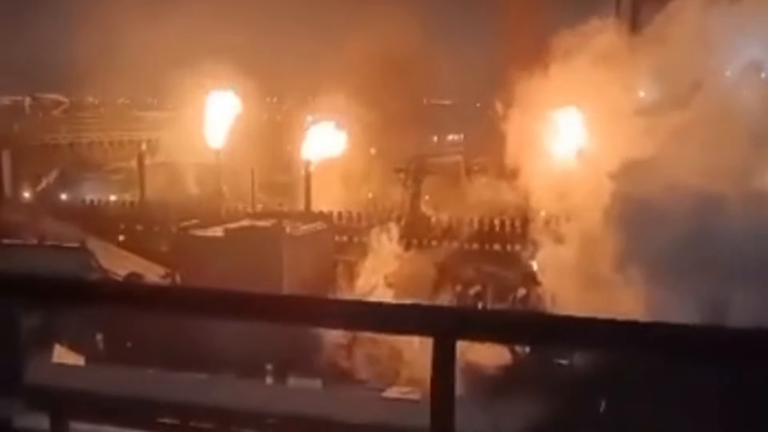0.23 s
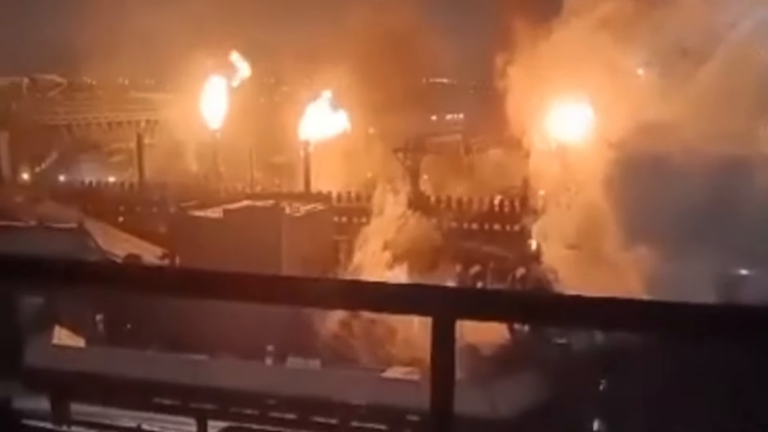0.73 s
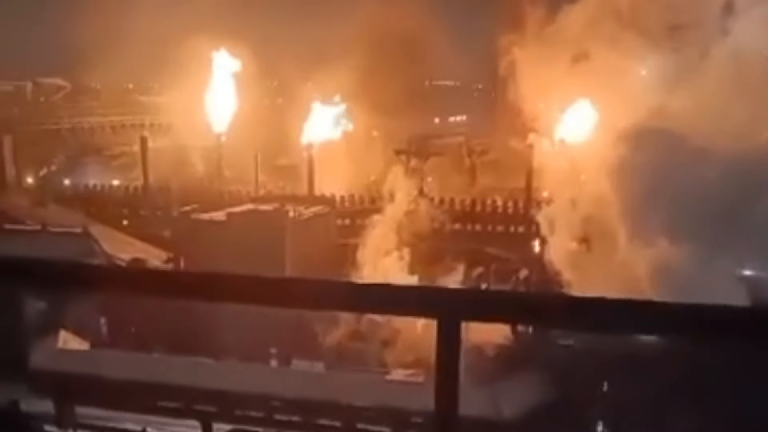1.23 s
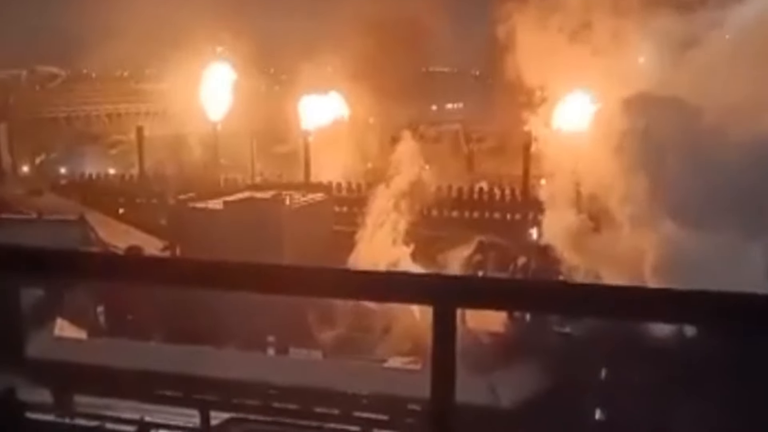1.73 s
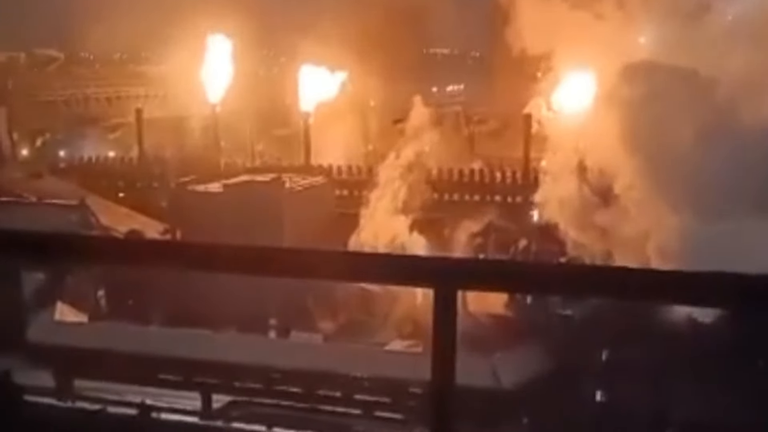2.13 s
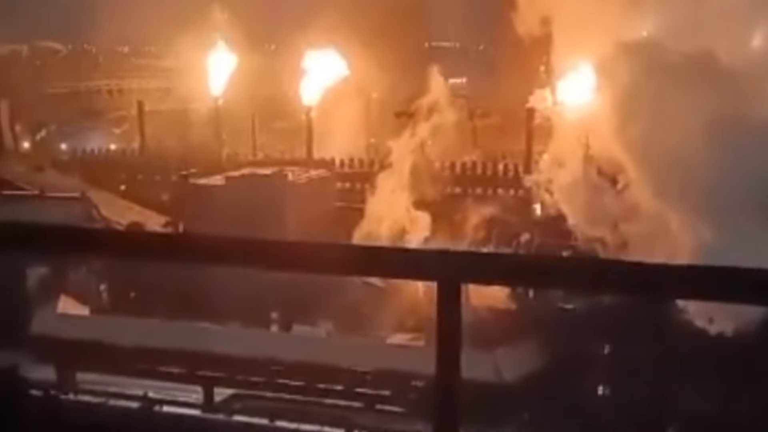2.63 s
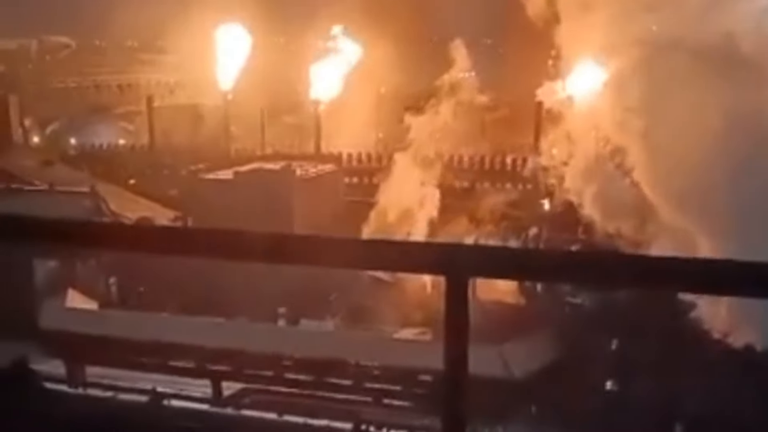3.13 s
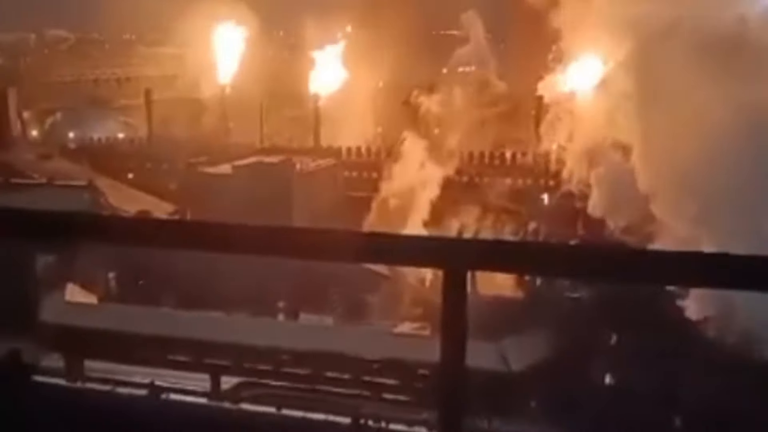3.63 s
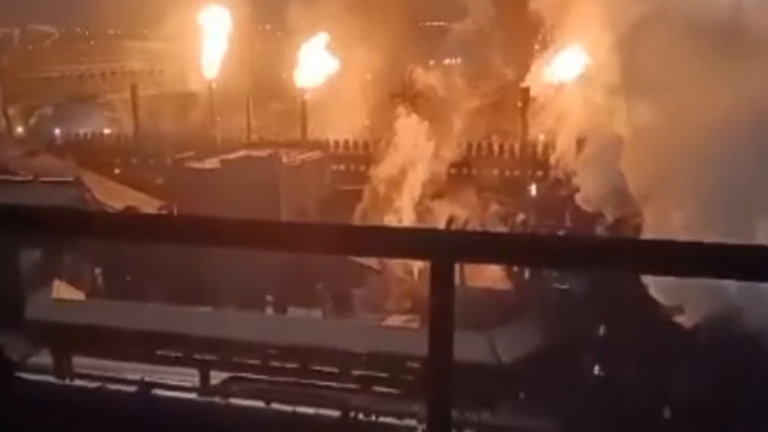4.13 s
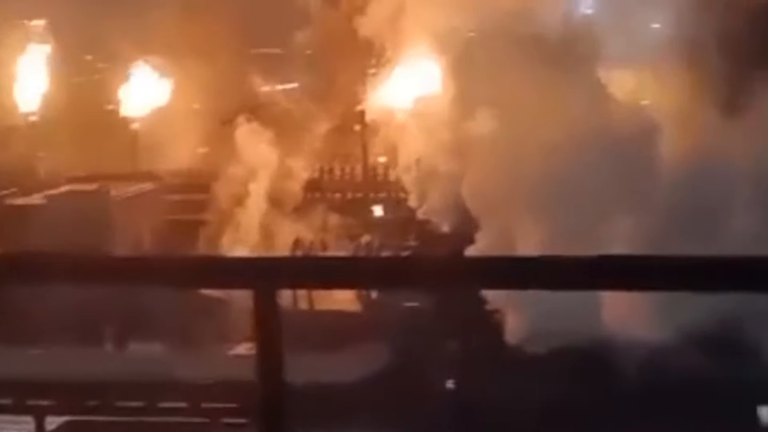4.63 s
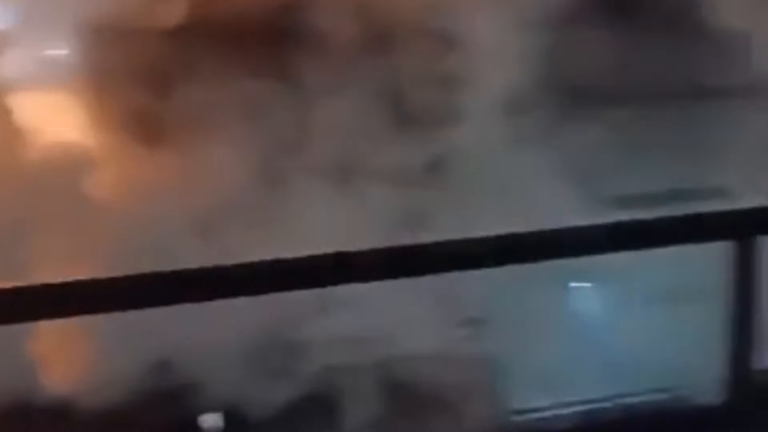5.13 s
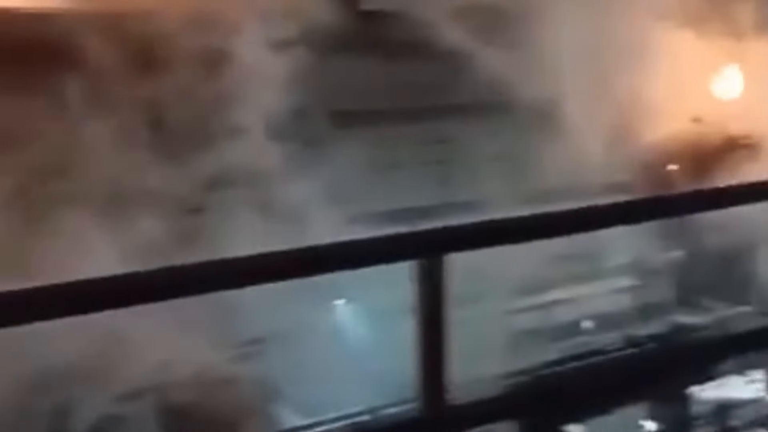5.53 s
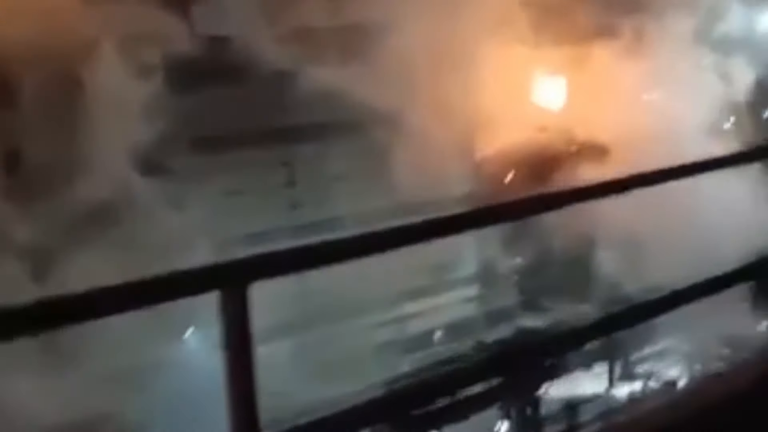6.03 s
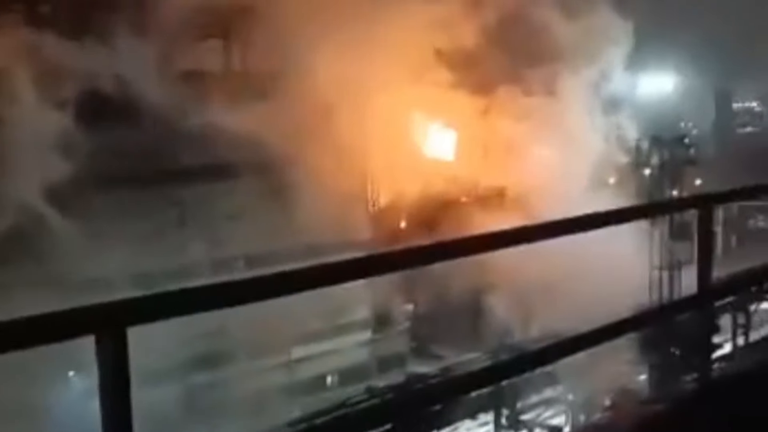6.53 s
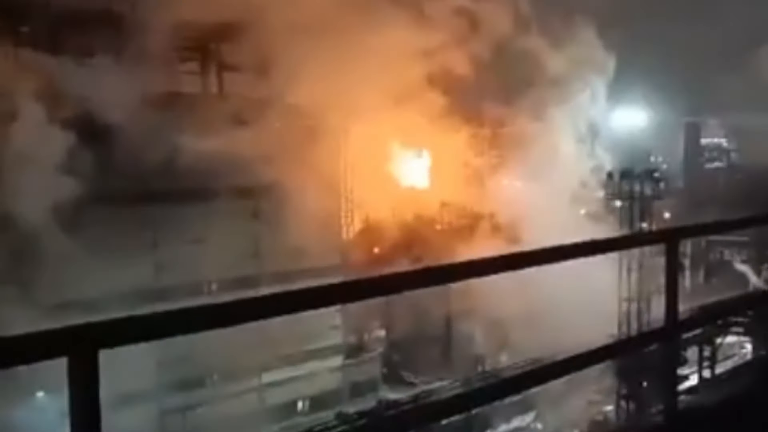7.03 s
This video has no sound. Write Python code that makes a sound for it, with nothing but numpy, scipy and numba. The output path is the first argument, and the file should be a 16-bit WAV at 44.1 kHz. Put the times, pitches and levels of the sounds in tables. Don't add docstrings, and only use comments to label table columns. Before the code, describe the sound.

A row of gas flares at an industrial works, a few hundred metres away in open night air, gives a continuous deep roar with a broad gassy rush and thin high whistling hiss. A faint low blower hum wavers in and out beneath. From 0 to 0.7 s wind buffets the phone's microphones, thumping and knocking separately left and right. It eases from about 0.9 to 1.7 s, leaving roar and hiss, then hits again around 1.8-2.4 s. After a calmer second, gusts return at 3.4-4.2 s. Small whumps of gas catching come near 4.4-4.9 s as the phone swings right; wind grows raspier, with dense hard knocks from 4.9 to 5.9 s. The level ducks under strong hits. From 6 s the wind falls away and the fire swells to the end, fluttering with rapid soft whumps. The hiss sounds grainy and watery, with dulled top end.

```python
import sys
import numpy as np
from scipy import signal
from scipy.fft import rfft, irfft, next_fast_len
from scipy.io import wavfile
from scipy.ndimage import uniform_filter1d
from numba import njit

SR = 44100
rng = np.random.default_rng(int(sys.argv[2]) if len(sys.argv) > 2 else 0)


def inscribe(sig):
    pcm = np.round(np.clip(np.atleast_2d(sig).T, -1, 1) * 32767)
    wavfile.write(sys.argv[1], SR, pcm.astype(np.int16))


def volts_from_decibels(level):
    exponent = np.asarray(level, float) / 20
    return 10 ** exponent


N = 320594
T = np.arange(N) / SR
M = next_fast_len(N)
LOG_HZ = np.log(np.fft.rfftfreq(M, 1 / SR) + 1e-3)

# time in seconds, share 0-1.
FACING = [
    (0, 0.79),
    (1, 0.77),
    (2, 0.75),
    (3.5, 0.9),
    (4.5, 0.82),
    (5, 0.5),
    (6, 0.46),
    (7.27, 0.37),
]

# frequency in Hz, level in dB.
RUMBLE_COLOUR = [(15, -48), (30, -16), (45, -19), (60, -6), (95, -5), (150, -2.5), (220, -2.5), (300, -17),
                 (400, -63)]
BODY_COLOUR = [(150, -57), (220, -3.5), (290, 1.5), (430, -1), (560, -5.5), (700, -9), (900, -38.5)]
EDGE_COLOUR = [(400, -45), (560, -6), (700, 0), (1000, -5), (1350, -10.5), (1700, -35), (2200, -41)]
# time in seconds, level in dB.
ROAR = [(0, -30.5), (.8, -29), (1.5, -29), (2.0, -28), (2.5, -29), (3.3, -28), (3.9, -27.5), (4.4, -25),
        (4.9, -26), (5.5, -27.5), (6.1, -27), (6.7, -24.5), (7.27, -23.5)]
# time in seconds, level in dB.
BURN = [(0, -36), (.8, -36), (1.4, -36.5), (2.0, -35.5), (2.8, -35.5), (3.5, -36.5), (4.2, -35),
        (4.8, -34.5), (5.3, -33.5), (5.9, -35), (6.4, -32.5), (6.8, -29.5), (7.27, -28)]
# time in seconds, gain in dB.
LULLS = [(0, 0.5), (.5, -2), (1.05, -4.5), (1.4, -1), (2.0, 0), (2.6, -2.5), (3.2, 1), (4.0, 0), (4.7, 1),
         (5.3, -1), (6.2, -1.5), (7.27, 0.5)]
# time in seconds, peak in dB, pitch in Hz.
WHUMPS = [(4.415, -20, 263), (4.477, -14, 297), (4.699, -24, 250), (4.89, -29, 200), (6.036, -12.5, 346),
          (6.265, -15, 250), (6.379, -16, 304), (6.553, -16.5, 190), (6.64, -14, 308), (6.678, -15.5, 198),
          (6.848, -16, 480), (7.0, -14, 402), (7.035, -12.5, 297), (7.125, -18, 198)]

# frequency in Hz, level in dB.
RUSH_COLOUR = [(900, -6), (1300, -1.5), (1600, 2), (2200, 2), (3000, 2.5), (3600, 1), (4100, -2.5),
               (4600, -8.5), (5400, -32)]
WHISTLE_COLOUR = [(3800, -16.5), (4500, -5), (5300, -2), (6300, 1.5), (7300, 2.5), (7900, -2.5), (8420, -6),
                  (8650, -22), (9300, -9), (9700, -15.5), (10800, -10.5), (11500, -8), (11900, -7)]
# time in seconds, level in dB.
FLOW = [(0, -31), (.5, -32.5), (.75, -33.5), (1.4, -34), (1.62, -31.5), (2.3, -31), (2.65, -30.5),
        (3.0, -32.5), (3.3, -29), (3.8, -31), (4.0, -32.5), (4.5, -31), (5.1, -33), (5.7, -35.5),
        (6.0, -33), (6.4, -32.5), (6.6, -35), (7.27, -31.5)]
# frequency in Hz, left minus right in dB.
PORT_CAVITIES = [(2000, 1), (4500, -2), (5800, 4), (6600, 1.5), (7400, -5.5), (8300, -4), (10000, -1),
                 (12000, -10)]
# frequency in Hz, level against the common part in dB.
OPPOSED_FACING = [(900, -9.5), (1330, 2.5), (2100, -19), (2780, -3.5), (3400, -14), (4500, 12.5)]
OPPOSED_TURNED = [(900, 4), (1400, -2), (2440, 4.5), (2800, -2), (3450, -5), (4400, -1.5)]
# frequency in Hz, gain in dB.
TURNED_DIP = [(1500, -2), (2000, -4.5), (2440, -9.5), (2830, -2), (3500, -2.5)]

# time in seconds, second tone in dB, first tone in dB.
BLOWER_CARRY = [(0, -39, -40), (.55, -34.5, -24.5), (.85, -38, -38), (1.2, -33, -33.5),
                (1.65, -30.5, -37.5), (2.3, -32, -34), (2.62, -40.5, -47), (2.85, -30.5, -48),
                (3.2, -36.5, -36), (3.6, -40.5, -30.5), (3.9, -35.5, -30.5), (4.5, -35, -30.5),
                (4.9, -36, -33), (5.4, -34, -32.5), (5.8, -38.5, -41), (6.4, -35.5, -31), (6.85, -33, -37),
                (7.27, -33.5, -30)]

# frequency in Hz, level in dB.
THUMP_COLOUR = [(15, -40), (25, -14), (60, -6), (113, 3.5), (206, -0.5), (350, -5), (520, -26.5),
                (700, -27), (1000, -76), (3000, -130)]
RASP_COLOUR = [(200, -10), (400, 6.5), (650, -4.5), (900, -13), (1300, -21), (2000, -28), (3000, -64),
               (8000, -120)]
# time in seconds, peak in dB, half length in ms.
LEFT_GUSTS = [(0.0, -22, 23), (.055, -16.5, 18), (.16, -22, 9.9), (.454, -20, 9.5), (.509, -10, 35),
              (.569, -12, 9.6), (.654, -14, 26), (.703, -38, 6.2), (1.806, -21.5, 35), (1.896, -8.5, 6.6),
              (1.961, -12.5, 23), (2.065, -13.5, 37), (2.155, -13, 8.5), (2.23, -20.5, 51),
              (2.385, -7, 6.2), (3.537, -11.5, 12.4), (3.567, -16, 5.2), (3.821, -15, 21),
              (3.981, -16.5, 8.5), (4.101, -52, 11), (4.2, -21, 26), (4.44, -22, 42), (4.914, -21.5, 104),
              (5.218, -14.5, 6.5), (5.443, -24, 94), (5.617, -20, 74), (5.682, -5, 2.8), (5.722, -17, 37),
              (5.847, -16.5, 11), (5.9, -37, 8.6)]
RIGHT_GUSTS = [(.061, -9, 10), (.15, -15, 9.1), (.2, -13, 13), (.309, -9.5, 8.7), (.419, -16.5, 99),
               (.439, -7.5, 8.1), (.544, -19.5, 31), (.663, -43, 42), (1.891, -8, 3.7), (1.966, -13, 32),
               (2.115, -14, 29), (2.295, -16, 33), (3.412, -14.5, 15), (3.492, -10, 33), (3.582, -17, 15),
               (3.632, -11.5, 7), (3.712, -13, 20), (3.831, -17.5, 37), (3.961, -23.5, 18),
               (4.091, -21, 48), (4.704, -15, 6.4), (4.934, -16, 30), (5.098, -19, 19), (5.243, -16.5, 40),
               (5.353, -16.5, 5.1), (5.383, -19.5, 26), (5.488, -19.5, 27), (5.565, -16.5, 18),
               (5.687, -24, 5.4), (5.817, -17, 7.2)]
# time in seconds, level in dB.
BREEZE = [(0, -28.5), (.75, -28), (.9, -48), (1.45, -53), (1.75, -30), (2.5, -27.5), (2.8, -45), (3.3, -60),
          (3.4, -31.5), (4.3, -32.5), (5.0, -35.5), (5.9, -28), (5.98, -50.5), (7.27, -46)]
# time in seconds, peak in dB, pitch in Hz.
LEFT_KNOCKS = [(.065, -15, 240), (.495, -20, 235), (.533, -12, 235), (.654, -10, 250), (3.533, -9.5, 247),
               (3.555, -11, 200), (3.849, -13, 160), (3.971, -13, 189), (4.102, -13, 280), (4.195, -4, 198),
               (4.94, -23, 159), (5.432, -15, 194), (5.451, -27, 225), (5.482, -20, 125), (5.51, -13, 200),
               (5.525, -9, 240), (5.548, -20, 185), (5.592, -10, 145), (5.642, -3, 272), (5.699, -9, 180),
               (5.748, -3, 210)]
RIGHT_KNOCKS = [(.062, -10, 197), (.202, -4, 130), (.331, -18, 160), (.398, -13, 145), (.501, -15, 190),
                (.579, -14, 200), (1.998, -5, 180), (2.145, -18, 175), (2.305, -10, 240), (3.471, -12, 182),
                (3.584, -6, 129), (3.647, -8, 160), (3.71, -8, 170), (4.018, -15, 173), (4.897, -18, 114),
                (4.983, -20, 160), (5.093, -10.5, 225), (5.226, -14, 190), (5.261, -7, 235),
                (5.446, -12.5, 188), (5.489, -11, 294), (5.55, -7.5, 180), (5.568, -16, 150),
                (5.685, -18, 180)]

# frequency in Hz, limit against the local mean in dB.
LOST_BELOW = [(300, -22), (900, -10), (1500, -7), (2400, -7), (3100, -7.5), (3650, -5.5), (4080, -4.5),
              (4400, -5.5), (5000, -6), (6200, -8), (8300, -16), (8600, -8), (8620, 2.5), (9640, 3),
              (9660, -4.5), (11000, -4), (11050, -1), (11400, 1), (11710, 4), (11720, 40)]
# frequency in Hz, rise of that limit in dB.
SIDE_LOST_MORE = [(300, 5), (700, 7), (1100, 5), (1500, 5), (2000, 5), (2500, 3.5), (3000, 5), (3600, 6.5),
                  (4100, 5), (4500, 5), (6000, 4), (7000, 0)]
# time in seconds, length in seconds, centre in Hz, width in Hz.
DROPOUTS = [(.22, .04, 5400, 250), (.3, .08, 4450, 200), (.82, .04, 4250, 250), (1.0, .06, 3950, 250),
            (1.19, .05, 4200, 130), (1.63, .12, 4100, 130), (2.475, .04, 3780, 250), (2.93, .08, 4080, 150),
            (5.65, .04, 2450, 250), (1.86, .05, 4000, 350), (2.33, .04, 4200, 350), (2.77, .04, 4050, 300),
            (3.58, .05, 4100, 500), (3.73, .06, 4000, 350), (3.9, .08, 4150, 250), (4.275, .04, 4200, 600),
            (4.855, .13, 5000, 560), (5.3, .05, 3950, 300), (5.37, .04, 6000, 300), (6.39, .1, 10000, 2600),
            (6.485, .06, 4450, 400), (6.59, .06, 9900, 700), (6.82, .14, 9900, 700), (7.0, .045, 4950, 500),
            (5.4, .04, 2300, 250), (5.93, .06, 2150, 250), (6.42, .05, 2450, 250), (6.9, .06, 2400, 250),
            (7.1, .05, 2450, 200), (.77, .04, 3360, 130), (.76, .04, 4120, 110), (1.0, .09, 4280, 130),
            (1.11, .05, 3830, 150), (1.1, .06, 4120, 110), (1.41, .07, 3830, 110), (1.47, .05, 4080, 130),
            (1.52, .05, 4650, 150), (1.67, .03, 4480, 200), (1.81, .06, 4100, 150), (2.21, .03, 4090, 300),
            (3.32, .03, 4050, 220), (3.87, .06, 4870, 220), (4.39, .05, 3790, 170), (5.09, .02, 4900, 350),
            (5.61, .06, 3960, 220), (6.24, .09, 4320, 130), (6.76, .04, 5900, 180), (6.79, .1, 8200, 170),
            (6.41, .05, 8150, 250), (7.15, .01, 4950, 300)]
# frequency in Hz, step in dB.
STEP = [(150, 4), (500, 1), (900, -1.5), (1200, -1), (3000, -1.5), (4000, -1), (5200, -3.5), (6200, -2.5),
        (7000, -6), (7900, -12), (8500, -9), (11500, -11)]


def unit(x):
    return x / np.sqrt(np.mean(x ** 2, axis=-1, keepdims=True))


def shape(points):
    hz, db = np.transpose(points)
    return volts_from_decibels(np.interp(LOG_HZ, np.log(hz), db))


def colour(x, points):
    return irfft(rfft(x, M) * shape(points), M)[..., :N]


def curve(rows):
    s, *columns = np.transpose(rows)
    return np.array([np.interp(T, s, c) for c in columns])


def walk(rate, size=1):
    k = int(SR / 64 / rate) + 1
    held = np.repeat(rng.standard_normal((size, 400))[:, :N // 64 // k + 1], k, axis=1)
    slow = 1.3 * uniform_filter1d(uniform_filter1d(held, k), k)
    return np.repeat(slow, 64, axis=1)[:, :N]


def turbulence(points, shared_db, own_db, rate, channels):
    noise = rfft(rng.standard_normal((channels, M))) * shape(points)
    step = np.log(2) / 3
    swell = walk(rate)[0]
    out = 0
    for centre in np.arange(np.log(points[0][0]), np.log(points[-1][0]), step):
        band = irfft(noise * np.clip(1 - abs(LOG_HZ - centre) / step, 0, 1), M)[:, :N]
        out = out + band * volts_from_decibels(shared_db * swell + own_db * walk(1.8 * rate)[0])
    return unit(out)


def spread(three, like):
    return np.sqrt(like) * three[0] + np.sqrt(1 - like) * three[1:]


def flames():
    rumble = spread(turbulence(RUMBLE_COLOUR, 0.85, 2.85, 4.0, channels=3), 0.99)
    body = spread(turbulence(BODY_COLOUR, 1.9, 0.44, 5.0, channels=3), 0.9)
    edge = spread(turbulence(EDGE_COLOUR, 0.77, 1.3, 6.0, channels=3), 0.78)
    rumble = rumble * volts_from_decibels(-27.5 + curve(LULLS)[0])
    return rumble + body * volts_from_decibels(curve(ROAR)[0]) + edge * volts_from_decibels(curve(BURN)[0] + 0.5)


def jets():
    flow_db = curve(FLOW)[0]
    facing = np.clip(curve(FACING)[0], 0, 1)
    turned = 1 - facing

    rush_db = flow_db.mean() + 0.71 * (flow_db - flow_db.mean()) - 2.0 + 2.5 * turned
    common, other = turbulence(RUSH_COLOUR, 0.81, 1.0, 14.0, channels=2)
    common = facing * common + turned * colour(common, TURNED_DIP)
    opposed = facing * colour(other, OPPOSED_FACING) + turned * colour(other, OPPOSED_TURNED)
    rush = common + opposed * np.array([[1], [-1]])

    whistle = spread(turbulence(WHISTLE_COLOUR, 0.46, 1.32, 14.0, channels=3), 0.074)
    cavity = shape(PORT_CAVITIES) ** np.array([[.5], [-.5]])
    whistle = irfft(rfft(whistle, M) * cavity, M)[:, :N]
    pan_db = -0.8 * facing - 6 * turned
    whistle_db = flow_db + 2.94 + np.array([pan_db, -pan_db]) / 2
    return rush * volts_from_decibels(rush_db) + whistle * volts_from_decibels(whistle_db)


def blower():
    blade_hz, third_tone_db = 264.2, -44.5
    second_db, first_db = curve(BLOWER_CARRY)
    phase = 2 * np.pi * np.cumsum(blade_hz * (1 + .0016 * walk(8.0)[0])) / SR
    fading = volts_from_decibels(np.array([[3.2], [3], [2.8]]) * walk(22.0, size=3) + .3 * walk(5.0, size=3))
    multiples = (1, 1.5, 2)
    levels = (volts_from_decibels(first_db - 1.0), volts_from_decibels(third_tone_db), volts_from_decibels(second_db))
    hum = np.zeros(N)
    for multiple, level, fade in zip(multiples, levels, fading):
        hum += np.sqrt(2) * level * fade * np.sin(multiple * phase)
    return hum


def wind(gusts, rasp_db):
    rasp_builds_s, rasp_full_db, rasp_turned_db = 0.044, -12.5, 13
    push = np.zeros(N)
    for s, db, ms in gusts:
        near = slice(max(int((s - .2) * SR), 0), int((s + .2) * SR))
        push[near] += volts_from_decibels(db) * np.exp(-.5 * ((T[near] - s) * 1000 / ms) ** 2)
    torn = uniform_filter1d(push, int(rasp_builds_s * SR)) / volts_from_decibels(rasp_full_db)
    scrape = push * torn * volts_from_decibels(rasp_db + rasp_turned_db * (1 - curve(FACING)[0]))
    thump = colour(rng.standard_normal(M), THUMP_COLOUR)
    rasp = colour(rng.standard_normal(M), RASP_COLOUR)
    thump = unit(thump / uniform_filter1d(thump ** 2, int(.018 * SR)) ** .45)
    return 1.18 * push * thump + scrape * unit(rasp)


def breeze():
    eddies_per_s, scatter_db, rasp_db = 30, 4, -21
    thump = unit(colour(rng.standard_normal((2, M)), THUMP_COLOUR))
    rasp = unit(colour(rng.standard_normal((2, M)), RASP_COLOUR))
    size = volts_from_decibels(curve(BREEZE) + scatter_db * walk(eddies_per_s, size=2))
    return size * (thump + volts_from_decibels(rasp_db) * rasp)


def pressure_waves(rows, cycles):
    out = np.zeros(N)
    for s, db, hz in rows:
        near = slice(int((s - .05) * SR), int((s + .05) * SR))
        turns = (T[near] - s) * hz
        out[near] += volts_from_decibels(db) * np.exp(-(turns / cycles) ** 2) * np.sin(2 * np.pi * turns)
    return out


def scene():
    works = flames() + jets() + blower() + pressure_waves(WHUMPS, 1.35)
    gusts = np.array([wind(LEFT_GUSTS, rasp_db=-9), wind(RIGHT_GUSTS, rasp_db=-17)])
    knocks = np.array([pressure_waves(LEFT_KNOCKS, 1.14), pressure_waves(RIGHT_KNOCKS, 1.14)])
    return works + gusts + knocks + breeze()


@njit
def duck(x, top, slope, release):
    gain, peak = np.empty(len(x)), 0.
    for i in range(len(x)):
        peak = max(abs(x[i]), peak * release)
        gain[i] = (top / peak) ** slope if peak > top else 1.
    return gain


def rounded(pair):
    hop, grid, kept = 1024, 1011, 544
    rise = np.cumsum(np.kaiser(hop + 1, 4 * np.pi))
    window = np.sqrt(rise[:hop] / rise[-1])
    basis = np.cos(np.pi / hop * np.outer(np.arange(2 * hop) + (hop + 1) / 2, np.arange(kept) + .5))
    basis = basis * np.r_[window, window[::-1]][:, None]
    padded = np.pad(pair, ((0, 0), (2 * hop - grid, 3 * hop)))
    blocks = padded[:, :padded.shape[1] // hop * hop].reshape(2, -1, hop)
    lines = blocks[:, :-1] @ basis[:hop] + blocks[:, 1:] @ basis[hop:]

    chance = rng.standard_normal((lines.shape[1], kept // 16 + 1))
    hz = (np.arange(kept) + .5) * SR / 2 / hop
    step_db = np.interp(hz, *np.transpose(STEP))
    step = volts_from_decibels(step_db + 2 * chance[:, :1] + 3.2 * np.repeat(chance[:, 1:], 16, axis=1))
    whole = np.floor((abs(lines) / step) ** .75 + .4054)
    lines = np.sign(lines) * step * whole ** (4 / 3) * 2 / hop

    first, second = lines @ basis[:hop].T, lines @ basis[hop:].T
    return (first[:, 1:] + second[:, :-1]).reshape(2, -1)[:, hop - grid:][:, :N]


def thinned(x):
    hz, s, z = signal.stft([x[0] + x[1], x[0] - x[1]], SR, nperseg=2048, noverlap=1536)
    power = uniform_filter1d(uniform_filter1d(abs(z) ** 2, size=5, axis=1), size=3, axis=2)
    mean = uniform_filter1d(uniform_filter1d(power.max(axis=0), size=15, axis=1), size=9, axis=0)
    grain = 0.28 * ((hz > 900) & (hz < 7000))[:, None]
    z = z * (abs(z) ** 2 / (power + 1e-20)) ** grain

    roar = uniform_filter1d(power[0, (hz > 600) & (hz < 1300)].mean(axis=0), size=40)
    scarcity = (roar / np.median(roar)) ** .15 * volts_from_decibels(1.3 * np.interp(s, T, walk(20.0)[0]))
    luck = rng.standard_normal((2, len(hz) // 16 + 1, len(s) // 3 + 1))
    luck = np.kron(luck, np.ones((1, 16, 3)))[:, :len(hz), :len(s)]
    floor = volts_from_decibels(2 * np.interp(hz, *np.transpose(LOST_BELOW)))[:, None] * mean
    side_rise = volts_from_decibels(2 * np.interp(hz, *np.transpose(SIDE_LOST_MORE)))[:, None]
    floor = np.array([floor, floor * side_rise])
    margin = power / (floor + 1e-20)

    bands = np.repeat(margin[:, :1024].reshape(2, 128, 8, -1).mean(axis=2), 8, axis=1)
    margin[1, 24:400] = bands[1, 24:400]
    margin[:, 400:1024] = np.repeat(bands[:, 400::16] + bands[:, 408::16], 16, axis=1) / 2
    scatter_db = np.where(hz > 8600, 5, np.array([[1.2], [6]]))[..., None]
    keep = margin > scarcity * volts_from_decibels(scatter_db * luck)
    for at, length, centre, width in DROPOUTS:
        hole = np.outer(abs(hz - centre) < width / 2, abs(s - at) < length / 2 + .017)
        keep[:1 + (centre > 9000)] &= ~hole

    pair = signal.istft(z * keep, SR, nperseg=2048, noverlap=1536)[1][:, :N]
    mid, side = rounded(pair) / 2
    return np.array([mid + side, mid - side])


def low_pass(x):
    return signal.sosfilt(signal.butter(12, 12300, fs=SR, output="sos"), x)


def record(dry):
    duck_db, ratio, release_s = -6.5, 3.2, 0.14
    release = np.exp(-1 / (release_s * SR))
    gain = np.array([duck(port, float(volts_from_decibels(duck_db)), 1 - 1 / ratio, release) for port in dry])
    ducked = dry * uniform_filter1d(gain, int(0.0024 * SR))
    mix = thinned(ducked)
    return low_pass(mix)


dry = scene()
out = record(dry)
inscribe(out)
```